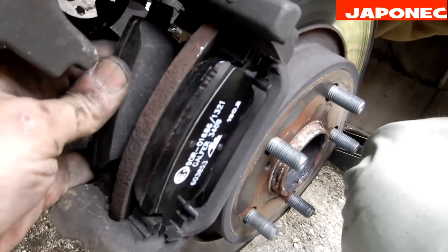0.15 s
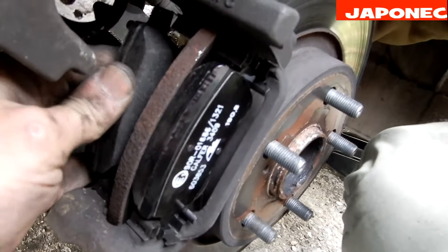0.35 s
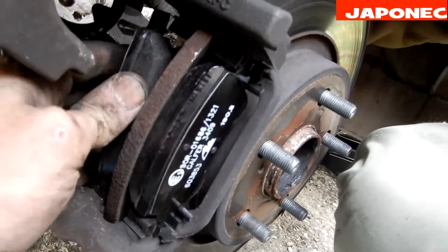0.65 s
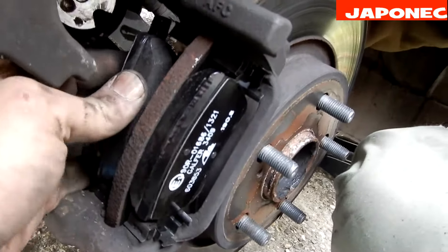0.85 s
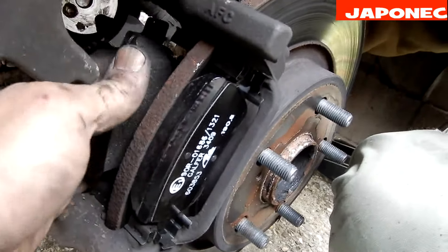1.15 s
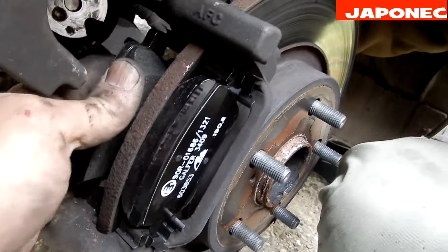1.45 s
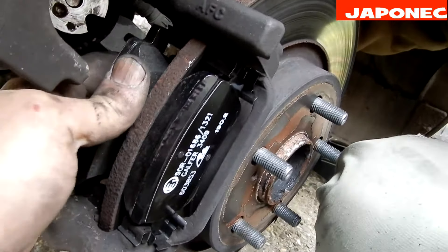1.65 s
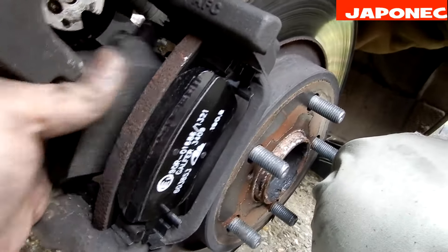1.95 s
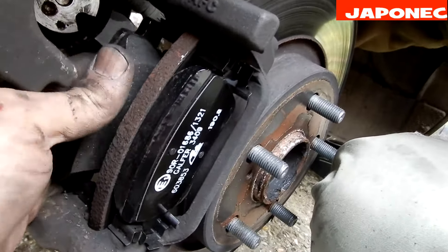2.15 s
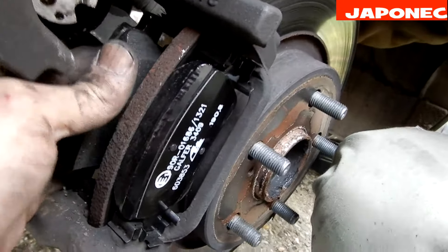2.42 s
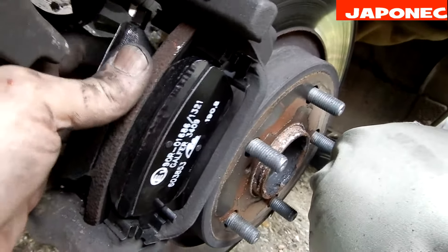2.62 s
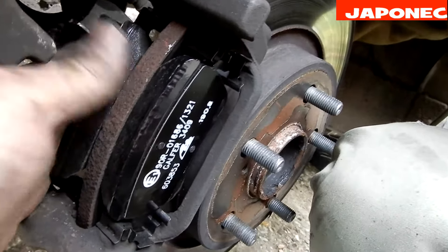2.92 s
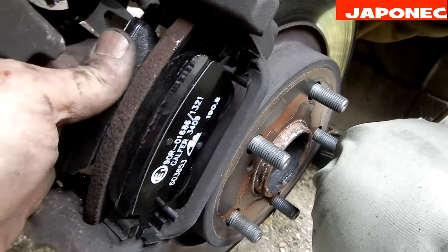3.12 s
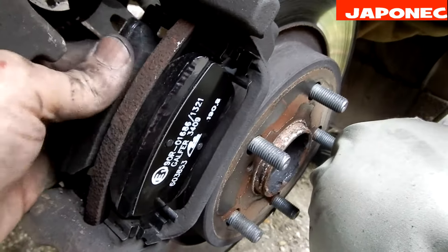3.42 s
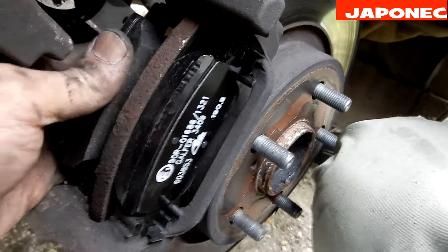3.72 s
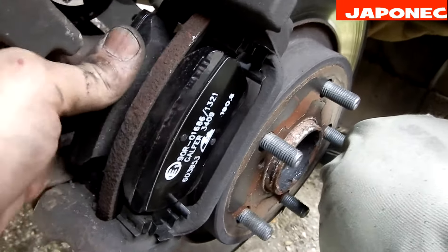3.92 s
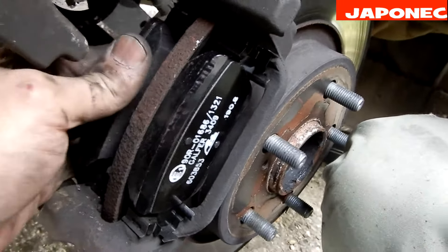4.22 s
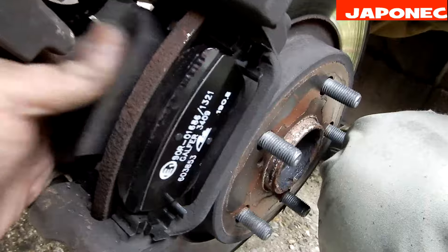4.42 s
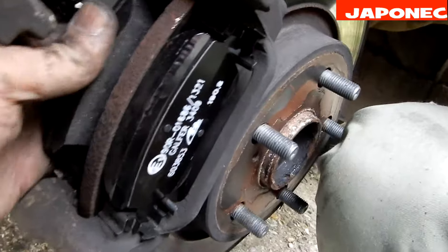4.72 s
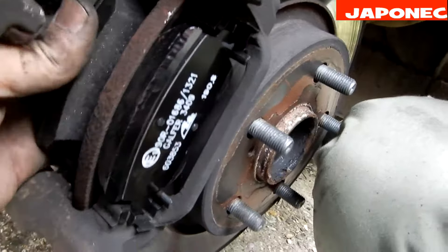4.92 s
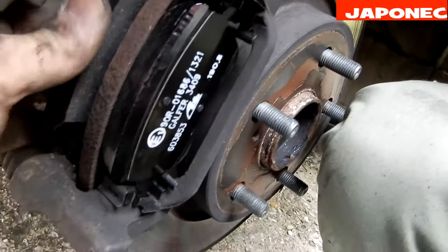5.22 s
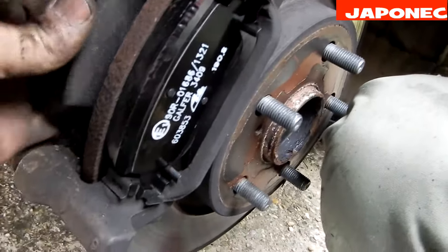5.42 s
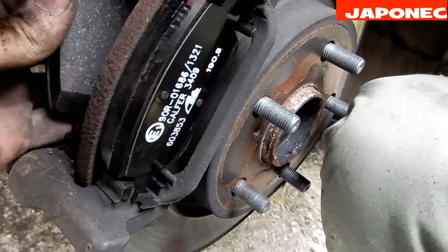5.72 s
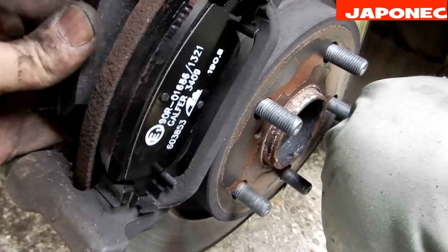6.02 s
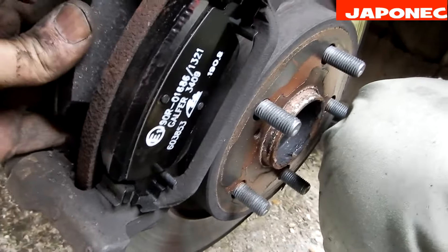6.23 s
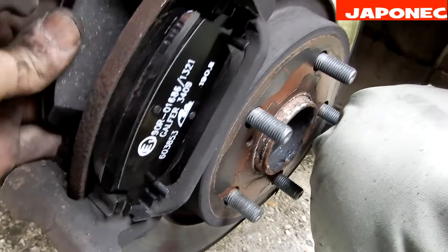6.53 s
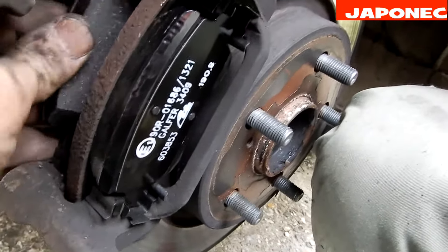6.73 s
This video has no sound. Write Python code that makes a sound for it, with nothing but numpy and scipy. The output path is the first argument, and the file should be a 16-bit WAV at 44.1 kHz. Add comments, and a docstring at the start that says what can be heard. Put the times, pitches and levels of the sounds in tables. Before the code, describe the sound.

A steel brake pad clinks and rattles irregularly into its holder, with hollow metallic knocks, faint gritty scraping and some wind on the microphone.

```python
"""Low wind rumble and hiss come first, and almost at once a sharp clink: a steel brake pad is being
worked into its carrier outdoors. Each impact excites damped modes, short and bright in the pad and
its spring clips, longer and hollow in the disc and hub. Grit ticks under the sliding pad, and wheel
arch and ground reflect these sounds. Gusts buffet two microphone ports; the hiss comes and goes."""
import sys
import numpy as np
from scipy import signal
from scipy.fft import rfft, irfft
from scipy.io import wavfile
from scipy.ndimage import uniform_filter1d

SR = 44100
rng = np.random.default_rng(int(sys.argv[2]) if len(sys.argv) > 2 else 0)


def generate_wav(signal):
    """Clip the signal to [-1, 1] and save it as 16-bit WAV at the path in sys.argv[1]."""
    frames = np.transpose(np.atleast_2d(signal))
    scaled = np.clip(frames, -1, 1) * 32767
    pcm = np.round(scaled).astype(np.int16)
    wavfile.write(sys.argv[1], SR, pcm)


N = 302526

# Course of the wind level: time_s, level_db
WIND_LEVELS = [(0.0, -41.5), (0.57, -49.5), (1.01, -41), (1.28, -41), (1.55, -57.5), (2.01, -61.5),
               (2.18, -51), (3.02, -34.5), (3.28, -28.5), (3.59, -39.5), (4.01, -30.5), (4.09, -48.5),
               (4.26, -54), (4.99, -68), (5.5, -47.5), (5.71, -69), (6.74, -58.5), (6.86, -50)]
# Turbulent pressure at the ports: frequency_hz, density_db
WIND_SPECTRUM = [(12, -41.5), (20, -4.5), (70, 4), (217, -1), (401, -13.5), (665, -32.5), (1500, -72),
                 (3300, -120)]
# Single strong buffets: peak_s, peak_db, left_minus_right_db
WIND_BUFFETS = [(0.97, -37, 3.5), (2.071, -35.5, -1), (2.269, -33, 1), (2.40, -36, 2.5), (2.809, -33.5, 9),
                (3.113, -17, 7), (3.225, -24, 16.5), (3.303, -26.5, -13), (3.336, -13, -2),
                (3.484, -20.5, -1.5), (3.61, -38.5, 12), (3.839, -20.5, 0.5), (4.108, -31.5, -19.5),
                (4.207, -25, -6), (4.621, -31.5, -10.5), (5.33, -45.5, 14), (6.192, -47, -8),
                (6.715, -38, 15), (6.851, -30, -8.5)]
# Course of the hiss: time_s, level_db, tilt_db_per_octave
HISS_COURSE = [(0.0, -52.5, -.5), (0.55, -59, -1.5), (0.85, -51, -1), (1.43, -51, -0.5), (1.601, -80, -3),
               (1.95, -74.5, -3.5), (2.0, -64, -3.5), (2.6, -54.5, -0.7), (3.129, -54, -1),
               (3.25, -48.5, -0.5), (3.689, -46.5, 1), (4.173, -49.5, -1.9), (4.32, -66, -0.5),
               (4.6, -65.5, -1), (4.91, -77.5, -4), (5.359, -63, 0.5), (5.6, -60, 0), (5.83, -85, -2.5),
               (6.549, -75, -3), (6.649, -67, -1), (6.86, -66.5, -3)]
# Hiss before tilting: frequency_hz, density_db
HISS_SPECTRUM = [(240, -23), (482, -5), (733, -11.5), (925, -10), (1030, -14), (1380, -18.5), (2870, -12.5),
                 (5950, -20), (8250, -15), (11500, -24.5), (13500, -36), (16300, -70)]
# Left-right likeness of the hiss: frequency_hz, correlation
HISS_COHERENCE = [(60, 0.7), (240, 0.33), (950, 0.6), (3770, 1), (15000, 0.15)]
# Clearest snaps of grit: start_s, over_hiss_db
GRIT_SNAPS = [(0.64, 21), (4.56, 21)]
# Blows to disc and hub: start_s, blow_db, low_note_hz, low_note_db, upper_note_hz, upper_note_db
DISC_BLOWS = [(0.019, -37.5, 1055, -40, 3580, -35.5), (0.288, -45.5, 850, -60, 3500, -37.5),
              (0.366, -45, 736, -39.5, 2720, -40.5), (0.404, -59.5, 1287, -39.5, 3440, -95),
              (0.531, -70, 1010, -46, 3870, -36.5), (1.303, -44.5, 1010, -53, 3267, -43),
              (1.51, -51.5, 780, -53.5, 3550, -59), (1.982, -48.5, 1072, -51, 3780, -63),
              (2.188, -38, 682, -43, 1930, -60), (2.249, -39.5, 617, -54, 1920, -68),
              (2.666, -67, 1056, -58, 4300, -57.5), (2.808, -31.5, 683, -31, 1965, -43),
              (3.136, -29, 678, -41, 2950, -49.5), (3.305, -40, 671, -37.5, 2750, -54.5),
              (3.476, -34, 644, -34.5, 4000, -44), (3.651, -41.5, 762, -33.5, 5480, -33),
              (3.77, -61, 1140, -69, 4240, -41), (3.898, -44, 1060, -49, 4280, -43.5),
              (4.235, -41, 996, -42, 5460, -29), (4.673, -55.5, 995, -60.5, 5080, -36.5),
              (4.915, -54.5, 1055, -66, 3400, -66), (5.05, -87, 1145, -52, 3050, -74),
              (5.094, -89, 1264, -57, 4400, -45.5), (5.137, -80, 1250, -50, 5754, -52),
              (5.192, -51.5, 1108, -53, 2330, -66.5), (5.654, -62.5, 788, -84.5, 3610, -51.5),
              (5.875, -59, 646, -56, 2035, -86), (6.194, -54.5, 660, -54, 2950, -59)]
# Modes of disc and hub: pitch_hz, level_db, t60_s
DISC_MODES = [(385.6, 2.5, 0.12), (490.8, -5, 0.2), (672, -9, 0.53), (742, -9.5, 0.43), (883, -7.5, 0.2),
              (1008, -8.5, 0.3), (1055, -13, 0.45), (1965, -20.5, 0.61), (2800, -3, 0.21),
              (3440, 0.5, 0.19), (3540, -3.5, .2), (4200, -6, .16), (4480, -6, 0.24), (5095, -8, 0.22),
              (5130, -7.5, 0.31), (5370, -5, 0.29), (5500, -8.5, 0.13), (6370, -5, 0.41), (6000, -7.5, 0.2)]
# Impacts of spring clips and pad: start_s, spring_db, spring_note_hz, pad_db, pad_note_hz, t60_ms
PAD_CONTACTS = [(0.0217, -5.5, 8440, -30, 4860, 22.5), (0.2835, -30, 8300, -20.5, 4900, 58),
                (0.2894, -8, 7600, -31, 2950, 32), (0.314, -21, 8030, -30, 2690, 47),
                (0.343, -23.5, 8300, -47, 5540, 46), (0.353, -30, 8400, -22, 2840, 58),
                (0.3668, -5, 7700, -19.5, 3470, 15.5), (0.381, -17, 7900, -22, 2790, 19),
                (0.391, -18, 8600, -15.5, 3525, 23), (0.4017, -4, 7490, -12.5, 3546, 23),
                (0.5303, -9.5, 7780, -16, 3650, 25), (0.611, -33.5, 9100, -57, 3900, 8),
                (0.7547, -26.5, 9600, -57, 2420, 5.5), (0.8518, -26.5, 9940, -54, 2970, 4),
                (1.223, -26.5, 9000, -27.5, 2210, 17), (1.302, -9, 8140, -16.5, 4710, 25),
                (1.3593, -23, 9680, -30.5, 3100, 13), (1.42, -29, 9600, -34, 4900, 105),
                (1.442, -1, 8850, -14, 4630, 10), (1.4553, -17, 9950, -29.5, 3580, 68),
                (1.467, -13, 8500, -24, 5430, 53), (1.4794, -28, 7900, -35, 3540, 250),
                (1.4938, -2.5, 7610, -22, 5750, 18.5), (1.5724, -21.5, 8580, -37, 3480, 30),
                (1.979, -37.5, 8400, -36.5, 2520, 15.5), (2.1672, -31.5, 8500, -37, 3720, 10),
                (2.184, -25, 7050, -29.5, 2710, 5.8), (2.243, -39.5, 6520, -35, 4720, 33),
                (2.3854, -16, 8280, -31, 3600, 45), (2.3969, -12, 8400, -31, 3460, 21),
                (2.505, -34, 9000, -35, 3850, 8.2), (2.6603, -10, 8880, -13, 3990, 18),
                (2.8064, -5.5, 8350, -15.5, 4850, 12), (3.0782, -29, 8100, -32.5, 4700, 10.6),
                (3.121, -25.5, 6460, -25, 4000, 58), (3.1303, -21.5, 8530, -17.5, 4360, 46),
                (3.3008, -15, 7950, -17.5, 3930, 20), (3.4316, -23.5, 8340, -28, 4000, 63),
                (3.4458, -9, 8500, -12.5, 4350, 16.6), (3.639, -21.5, 8290, -36.5, 3570, 87),
                (3.649, -9, 8060, -14, 4610, 29), (3.653, -21, 8900, -18, 5060, 65),
                (3.755, -27, 8490, -25.5, 3820, 43), (3.7706, -10, 8250, -17, 4050, 13),
                (3.799, -19, 8520, -31, 4280, 21), (3.8615, -23, 8260, -42, 4270, 65),
                (3.894, -28.5, 8340, -35, 3460, 94), (4.147, -30.5, 9500, -33.5, 4000, 7.2),
                (4.169, -17, 9100, -23.5, 3770, 42), (4.1937, -25, 8430, -26, 3420, 83),
                (4.223, -6, 8320, -17.5, 3710, 22), (4.235, -2, 8150, -14, 4050, 50),
                (4.2405, -12, 8000, -30, 4130, 46), (4.246, -11.5, 7570, -13.5, 3324, 34),
                (4.2596, -4, 9310, -11.5, 5130, 21), (4.2646, -22.5, 8500, -17, 4550, 13),
                (4.6544, -21, 9820, -32.5, 2640, 35), (4.668, -7.5, 8650, -21, 5780, 18),
                (4.681, -6.5, 8100, -24, 5830, 42), (4.7407, -29.5, 7880, -48.5, 3500, 93),
                (4.824, -29.5, 7700, -46, 4800, 63), (4.842, -17, 8120, -34, 5060, 11),
                (4.8983, -23, 8200, -50, 3870, 7.5), (4.9074, -37, 9770, -27.5, 4820, 26),
                (4.9133, -15, 8210, -42, 5050, 17), (5.0203, -32.5, 7950, -45.5, 4080, 10),
                (5.049, -26.5, 8360, -42.5, 3110, 20), (5.0906, -26, 8260, -33, 4340, 47),
                (5.0958, -24.5, 7600, -38, 2330, 28), (5.138, -11, 8470, -31, 4280, 10.4),
                (5.218, -35, 8630, -55, 3070, 17), (5.2595, -30.5, 8410, -44, 5600, 36),
                (5.313, -42.5, 8100, -50, 3400, 28), (5.657, -4, 8300, -17, 2710, 3),
                (5.6586, -16.5, 8400, -35, 3880, 18), (5.6851, -22, 7950, -40.5, 3590, 19.5),
                (5.725, -26, 7930, -40, 5800, 18), (5.876, -55, 8200, -53, 2470, 15),
                (6.082, -66, 8000, -68, 4140, 71), (6.1802, -32.5, 8040, -39.5, 3020, 87),
                (6.1946, -27.5, 8320, -28, 5270, 16), (6.268, -55.5, 8300, -63, 3500, 26),
                (6.824, -24, 7510, -33, 5080, 33)]
# Modes of the pad (below 6 kHz) and spring clips (above): pitch_hz, level_db, t60_over_contact_t60
PAD_AND_SPRING_MODES = [(2860, -8.5, 3.2), (3400, -16, 1.1), (3580, -12, 6.6), (3690, -5.5, 6.8),
                        (4280, -12.5, 6.5), (4550, -11, 3.3), (5430, -15, 1.4), (6760, -12.5, 6.9),
                        (8320, -2, 1.5), (8210, -17.5, 12), (9900, -14, 0.44), (9960, -7, 1.5)]
# Impact noise: frequency_hz, density_db
CRACK_SPECTRUM = [(500, -35.5), (2030, -21), (2800, -17), (3530, -14), (6240, -12.5), (8110, 4),
                  (8850, -18), (9940, -7.5), (10700, -24), (15400, -47.5)]
# Level difference between the ports: frequency_hz, left_minus_right_db
PORT_DIFFERENCE = [(60, -4), (380, 0), (2380, -4.5), (15000, -2)]


def amp(db):
    return 10 ** (np.asarray(db) / 20)


def decay(t, t60, db=0):
    """Exponential damping: starts at db and loses 60 dB every t60."""
    return amp(db - 60 * t / t60)


def unit_rms(x):
    return x / np.sqrt(np.mean(x ** 2) + 1e-20)


def smooth(x, width):
    return uniform_filter1d(uniform_filter1d(x, width), width)


def curve_at(points, hz):
    point_hz, value = np.transpose(points)
    return np.interp(np.log(hz + 1), np.log(point_hz + 1), value)


def coloured(x, points):
    """Filters x by a curve of frequency_hz, gain_db."""
    hz = np.fft.rfftfreq(x.shape[-1], 1 / SR)
    return irfft(rfft(x) * amp(curve_at(points, hz)), x.shape[-1])


def drift(channels, width):
    """Low-pass noise of rms 1 that changes over about width samples."""
    return unit_rms(smooth(rng.standard_normal((channels, N)), width))


def ring(hz, db, t60, t):
    """Modal superposition: one damped sine for each mode."""
    hz, db, t60 = np.array([hz, db, t60])[:, :, None]
    return (decay(t, t60, db) * np.sin(2 * np.pi * hz * t)).sum(0)


def wind():
    """Turbulence: independent eddies press on each port, while the gusts wander from side to side."""
    t, side = np.arange(N) / SR, np.array([[.5], [-.5]])
    wander_db, rise_db_per_s, fall_db_per_s = 9.5, 451, 418
    eddies = coloured(rng.standard_normal((2, N)) * amp(3.87 * drift(2, 430)), WIND_SPECTRUM)
    eddies /= np.sqrt(smooth(eddies ** 2, 5000))
    level = amp(np.interp(t, *np.transpose(WIND_LEVELS)) + side * wander_db * drift(1, 2700))
    for peak_s, peak_db, pan_db in WIND_BUFFETS:
        near = slice(max(round((peak_s - .2) * SR), 0), round((peak_s + .2) * SR))
        dt = t[near] - peak_s
        swell_db = np.minimum(rise_db_per_s * dt, -fall_db_per_s * dt)
        level[:, near] += amp(peak_db + side * pan_db + swell_db)
    pressure = 2.5 * np.tanh(eddies / 2.5) * uniform_filter1d(level, 600)
    # a quadratic term sharpens strong pushes into pops
    pops = coloured(pressure ** 2, [(40, -34), (150, -7), (450, 6), (1000, -12.5), (1400, -33)])
    return pressure + 1.4 * pops


def hiss():
    """Partly coherent broadband noise: its spectrum tilts, patches drift and the treble flickers."""
    frames, hz = N // 128 + 5, np.fft.rfftfreq(512, 1 / SR)
    time_s, *columns = np.transpose(HISS_COURSE)
    level_db, tilt = (np.interp(np.arange(frames) * 128 / SR, time_s, v) for v in columns)
    re, im, other_re, other_im, patches, flicker = rng.standard_normal((frames, 257, 6)).T
    patches = unit_rms(uniform_filter1d(uniform_filter1d(patches, 8, 0), 12, 1))
    flicker = unit_rms(uniform_filter1d(flicker, 90, 0)) * (hz > 2500)[:, None]
    coherence = curve_at(HISS_COHERENCE, hz)[:, None]
    left = re + 1j * im
    right = coherence * left + np.sqrt(1 - coherence ** 2) * (other_re + 1j * other_im)
    octaves = np.log2((hz[:, None] + 100) / 3000)
    colour = amp(curve_at(HISS_SPECTRUM, hz)[:, None] + tilt * octaves)
    colour /= np.linalg.norm(colour[hz > 1500], axis=0)
    spectra = np.array([left, right]) * colour * amp(level_db + 1.8 * patches + .83 * flicker)
    return signal.istft(spectra, nperseg=512, noverlap=384)[1][:, :N]


def grit():
    """Shot noise: grains under the pad snap at random, at a strength that follows the hiss."""
    ticks_per_s, t = 220, np.arange(1024) / SR
    impulses = amp(-6 + 2.2 * np.minimum(rng.exponential(1, N), 3))
    impulses *= rng.random(N) < ticks_per_s / SR
    for start_s, db in GRIT_SNAPS:
        impulses[round(start_s * SR)] = amp(db)
    spectrum = [(3000, -31.5), (6000, -12.5), (8200, -.5), (10500, -7), (13000, -36.5)]
    bursts = coloured(rng.standard_normal((2, len(t))), spectrum)
    envelope = decay(t, t60=.01) * np.minimum(t / .00049, 1)
    which = rng.integers(0, len(bursts), N)
    ticks = sum(signal.oaconvolve(impulses * (which == k), unit_rms(burst) * envelope)[:N]
                for k, burst in enumerate(bursts))
    return ticks * amp(np.interp(np.arange(N) / SR, *np.transpose(HISS_COURSE)[:2]))


def knock(scatter, blow_db, low_hz, low_db, upper_hz, upper_db):
    """Free vibration of struck disc and hub: two notes, set by how the pad sits, stand out."""
    t = np.arange(14336) / SR
    noise = rng.standard_normal(len(t))
    hz, db, t60 = np.transpose(DISC_MODES)
    hz, db, t60 = hz * (1 + .0015 * scatter[1]), db + 2.5 * scatter[0], np.clip(t60, .02, .6)
    upper = hz > 2500
    puff = unit_rms(signal.sosfilt(signal.butter(5, (200, 1050), "band", fs=SR, output="sos"), noise))
    rattle = .75 * unit_rms(smooth(noise[::-1], 300))
    hollow = ring(hz[~upper], db[~upper], t60[~upper], t) * (1 + rattle)
    body = amp(blow_db) * (hollow + decay(t, t60=.09, db=6) * puff)
    notes = ring([low_hz, upper_hz], [low_db, upper_db], [.18, .43 * min(2000 / upper_hz, 1)], t)
    notes *= 1 + .5 * rattle
    bright = ring(hz[upper], db[upper], t60[upper], t) * (1 + .7 * rattle)
    bright *= amp(.6 * upper_db + .43 * blow_db - 8.5)
    slow_rise, fast_rise = 1 - np.exp(-t / .0079), 1 - np.exp(-t / .0025)
    return (body + notes) * slow_rise + bright * fast_rise


def clink(scatter, spring_db, spring_hz, pad_db, pad_hz, t60_ms):
    """Impact excitation: spring clips and pad each crack and ring, over a low thud and a wide snap."""
    size, part_peak = 6144, .7
    t, t60 = np.arange(size) / SR, max(t60_ms, 4) / 1000
    rise = (1 - np.exp(-t / (.00014 + .024 * t60))) ** 2  # longer contacts build more slowly
    noise = coloured(rng.standard_normal(size), CRACK_SPECTRUM)
    hardness = [(10000, -1.1), (13000, .6 * (spring_db + 32)), (14500, -15.5)]  # hard is brighter
    spectrum, bin_hz = rfft(coloured(noise, hardness)), np.fft.rfftfreq(size, 1 / SR)
    # the highest treble of the crack starts weak and dies quickly
    treble_loss = irfft(spectrum * (bin_hz > 11690)) * (1 - decay(t, t60=.042, db=-7))
    hz, db, t60_ratio = np.transpose(PAD_AND_SPRING_MODES)
    mode_hz, mode_t60 = hz * (1 + .009 * scatter[1]), np.clip(t60_ratio * t60, .006, .085)
    springs = (spring_db, spring_hz, bin_hz > 6000, hz > 6000, treble_loss)
    pad = (pad_db, pad_hz, bin_hz <= 6000, hz < 6000, 0)
    parts = 0
    for part_db, note_hz, band, own, loss in (springs, pad):
        band_noise = irfft(spectrum * band)
        distance = np.minimum(abs(np.log(hz / note_hz)) / .13, 1)  # modes near the note stand out
        mode_db = db - 14 * distance + 5 * scatter[0]
        modes = ring(mode_hz[own], mode_db[own], mode_t60[own], t)
        notes_db = np.array([-1, -6]) - 1.2 * np.log(t60 / .016)
        notes = ring([note_hz, 1.1 * note_hz], notes_db, [1.4 * t60, 1.1 * t60], t)
        # loose contact modulates the rings into rough bands
        roughness = smooth(abs(band_noise[::-1]) / np.std(band_noise) - .8, 50)
        shake = 1 + .88 * np.tanh(unit_rms(roughness))
        burst = decay(t, 1.07 * t60, db=-6 + 1.7 * np.log(t60 / .075))
        tail = amp(-26.5 - 60 * (t / .1) ** .79)
        crack = (burst + tail) * (band_noise - loss) / np.std(band_noise)
        part = (modes + notes) * shake + crack
        parts += amp(part_db) * part_peak * part / abs(part * rise).max()
    thud = decay(t, t60=.0056, db=pad_db - 15.5) * np.sin(2 * np.pi * 400 * t)
    snap_spectrum = [(800, 0), (1400, -22.5), (2400, -1.5), (8000, -10), (12500, -42)]
    snap = unit_rms(coloured(rng.standard_normal(size), snap_spectrum))
    snap *= part_peak * decay(t, t60=.016, db=pad_db - 11)
    fade = np.minimum(np.arange(size)[::-1] / 1500, 1)
    return (parts + thud + snap) * rise * fade


def impacts(source, events, modes):
    """Superposition of impacts, each with its own random scatter of mode levels and pitches."""
    out = np.zeros(N + 16384)  # room for the last ring
    for (start_s, *settings), scatter in zip(events, rng.standard_normal((len(events), 2, len(modes)))):
        at, sound = round(start_s * SR), source(scatter, *settings)
        out[at:at + len(sound)] += sound
    return out


def ports(x):
    """Time and level differences: sound reaches the left port a little earlier and weaker."""
    hz, lead_s = np.fft.rfftfreq(x.shape[-1], 1 / SR), 19e-6
    left = amp(curve_at(PORT_DIFFERENCE, hz) / 2) * np.exp(1j * np.pi * hz * lead_s)
    return irfft(rfft(x) * np.array([left, 1 / left]), x.shape[-1])[:, :N]


def reflections(x):
    """Diffuse reflection: wheel arch and ground return a short tail."""
    t = np.arange(6000) / SR
    tail = rng.standard_normal((2, len(t))) * decay(t, t60=.054) * (t > .002)
    return signal.oaconvolve(x, tail / np.linalg.norm(tail[0]), axes=1)[:, :N]


def scene():
    """Pressures add at the ports: the brake's direct sound, its reflections, wind and hiss."""
    brake = impacts(clink, PAD_CONTACTS, PAD_AND_SPRING_MODES) + impacts(knock, DISC_BLOWS, DISC_MODES)
    brake[:N] += grit()
    direct = ports(brake)
    return direct + amp(-15) * reflections(direct) + wind() + ports(hiss())


def record(dry):
    """Downward expansion: a noise suppressor lowers faint treble, shortening tails; a low-pass follows."""
    threshold_db, cutoff_hz = -97, 16450
    hz, _, spectra = signal.stft(dry, SR, nperseg=512, noverlap=384)
    power = uniform_filter1d(uniform_filter1d((abs(spectra) ** 2).mean(0), 9, 0), 7, 1)
    under_db = np.clip(threshold_db - 10 * np.log10(power + 1e-20), 0, 12)
    gain = amp(-1.2 * under_db * (hz > 1200)[:, None])
    gated = signal.istft(spectra * gain, SR, nperseg=512, noverlap=384)[1][:, :N]
    lowpass = signal.firwin(511, cutoff_hz, window=("kaiser", 9), fs=SR)
    return signal.oaconvolve(gated, lowpass[None], "same")


dry = scene()
out = record(dry)
generate_wav(out)
```